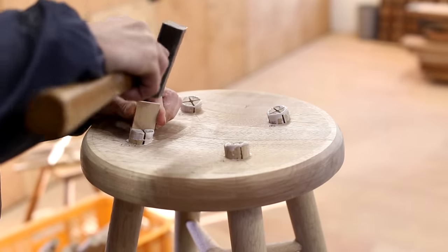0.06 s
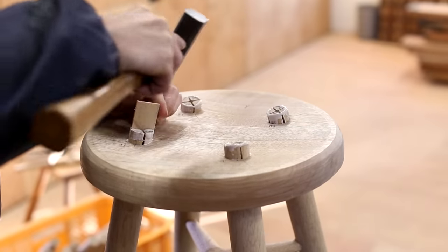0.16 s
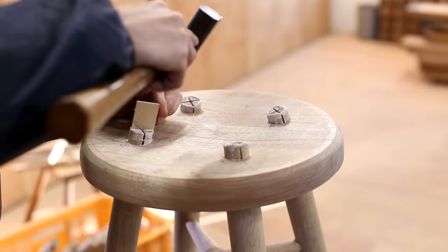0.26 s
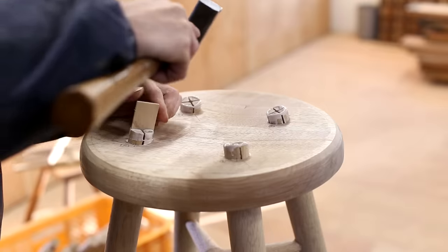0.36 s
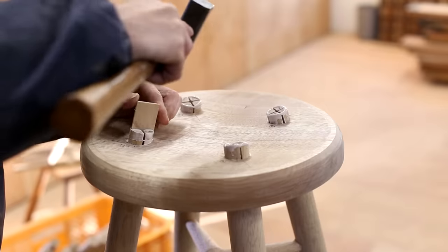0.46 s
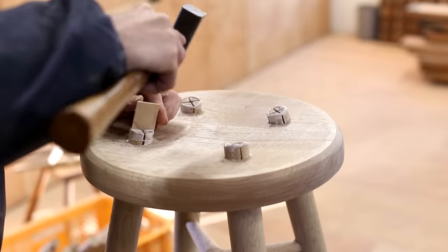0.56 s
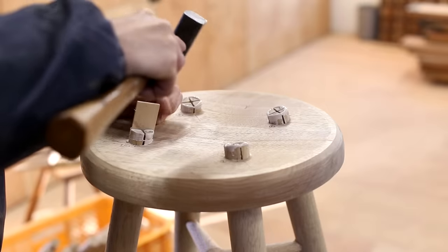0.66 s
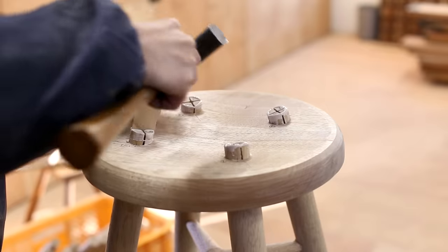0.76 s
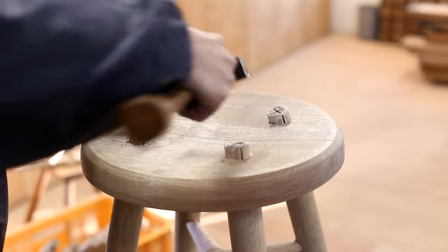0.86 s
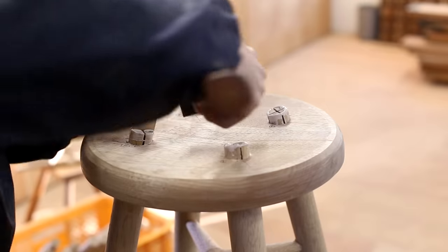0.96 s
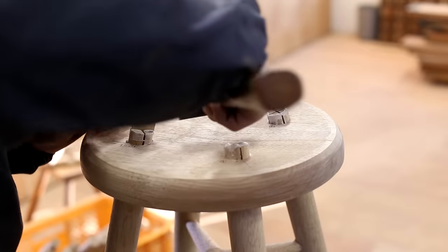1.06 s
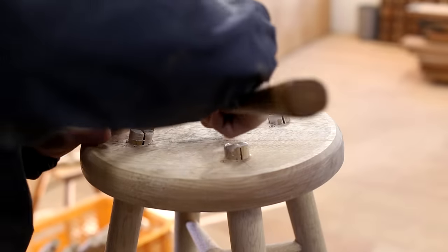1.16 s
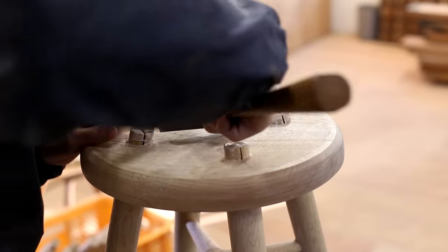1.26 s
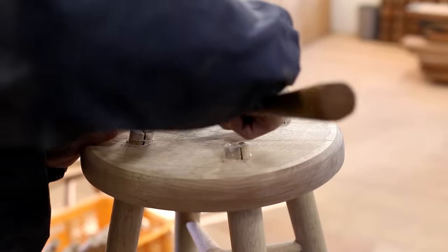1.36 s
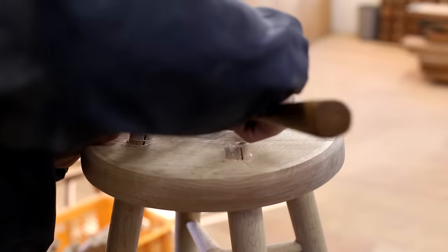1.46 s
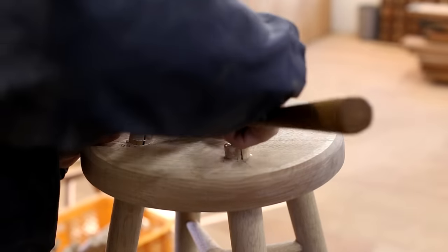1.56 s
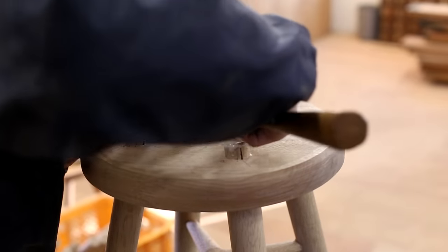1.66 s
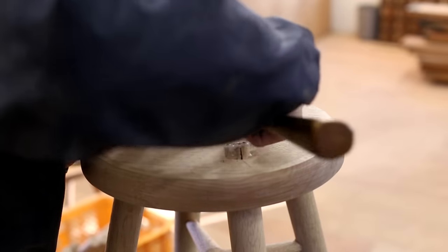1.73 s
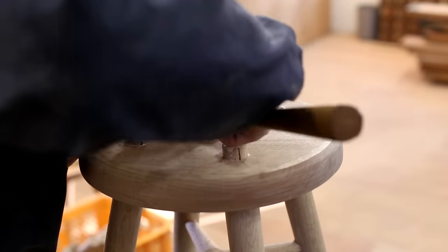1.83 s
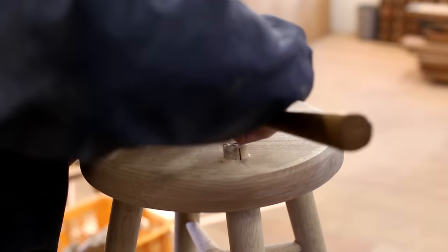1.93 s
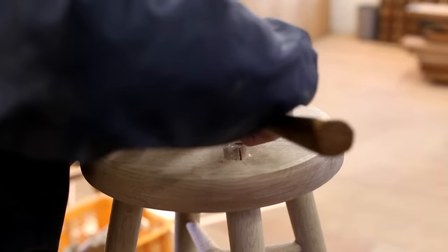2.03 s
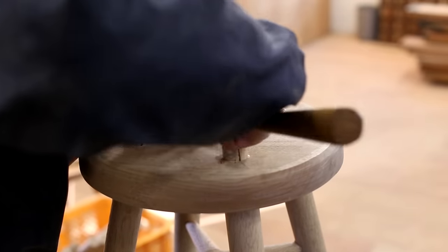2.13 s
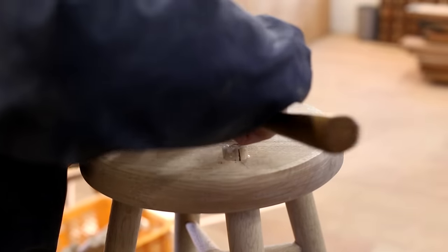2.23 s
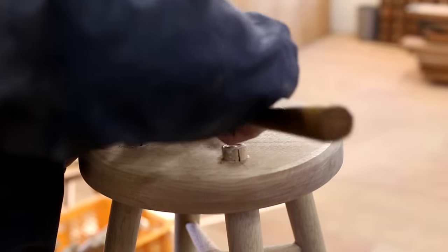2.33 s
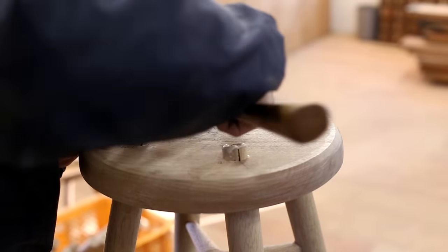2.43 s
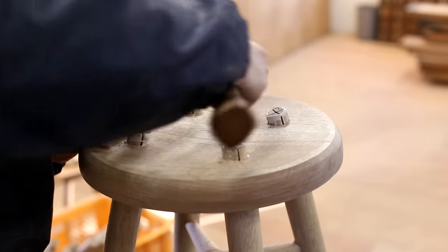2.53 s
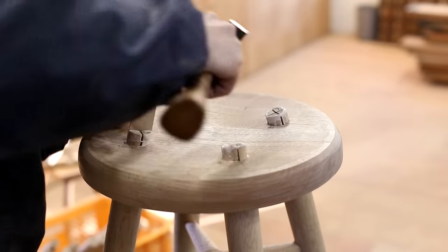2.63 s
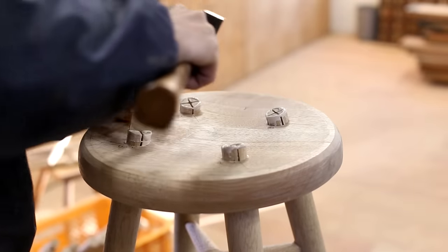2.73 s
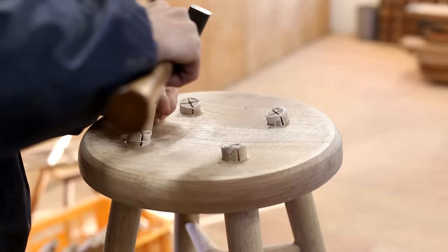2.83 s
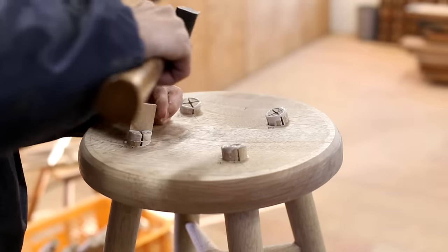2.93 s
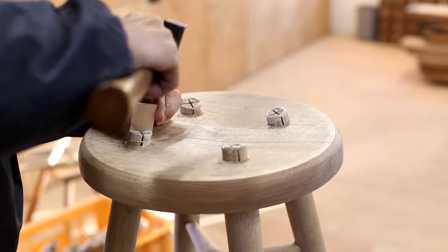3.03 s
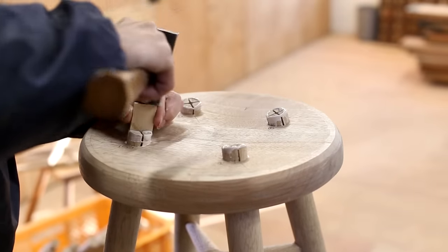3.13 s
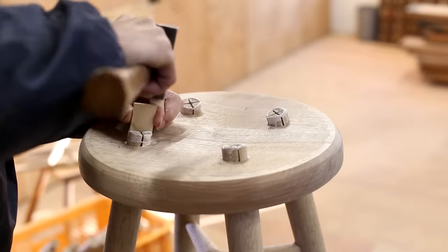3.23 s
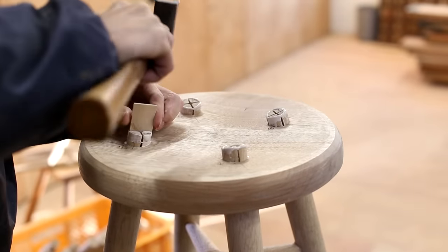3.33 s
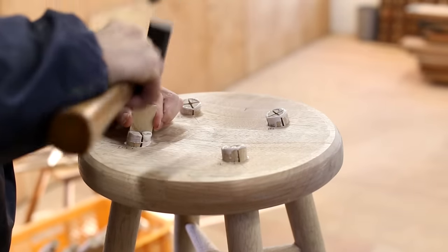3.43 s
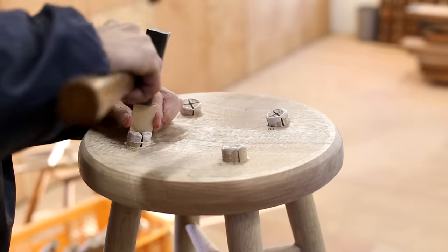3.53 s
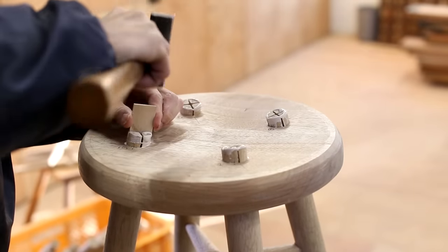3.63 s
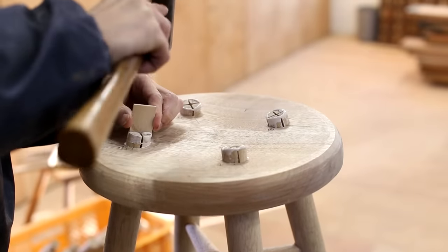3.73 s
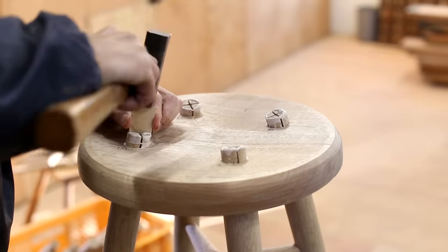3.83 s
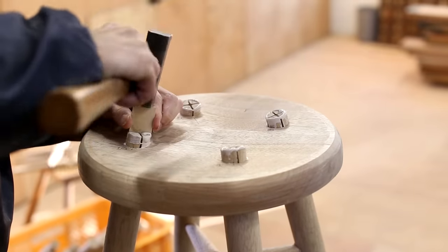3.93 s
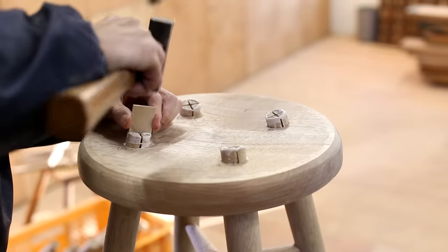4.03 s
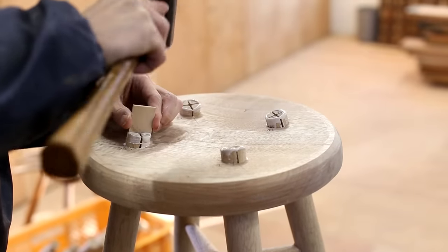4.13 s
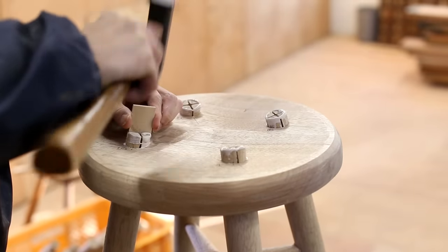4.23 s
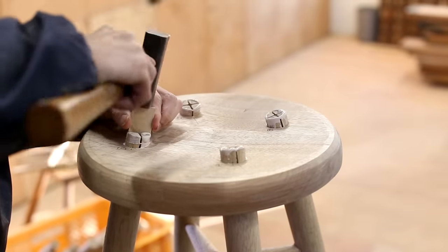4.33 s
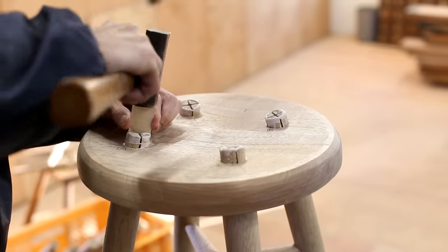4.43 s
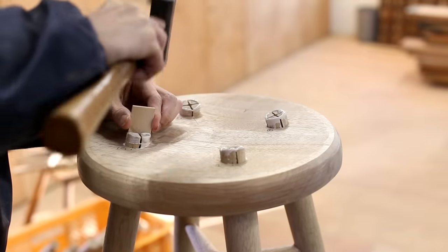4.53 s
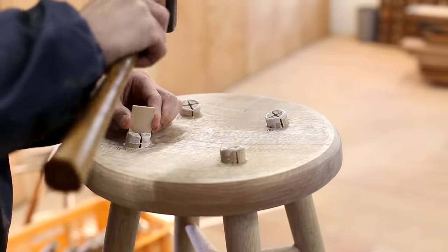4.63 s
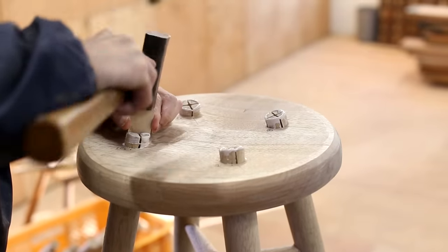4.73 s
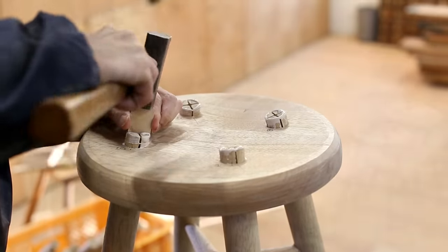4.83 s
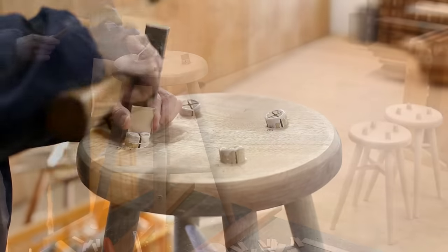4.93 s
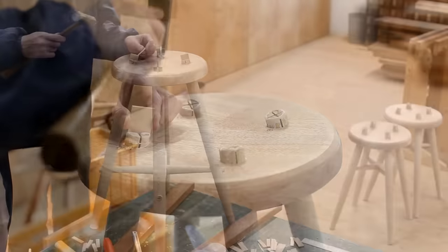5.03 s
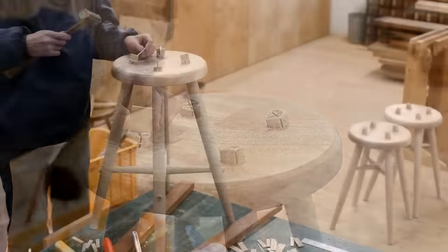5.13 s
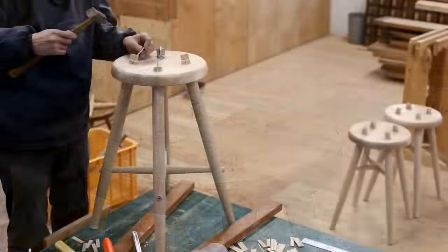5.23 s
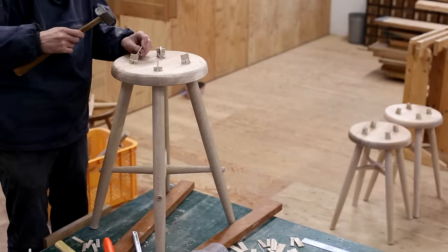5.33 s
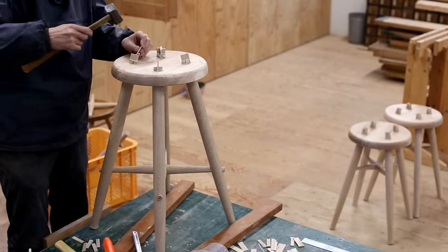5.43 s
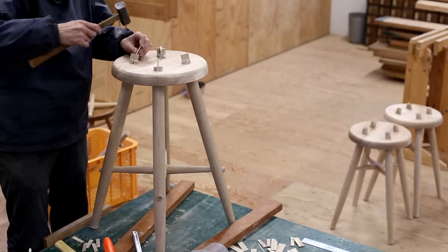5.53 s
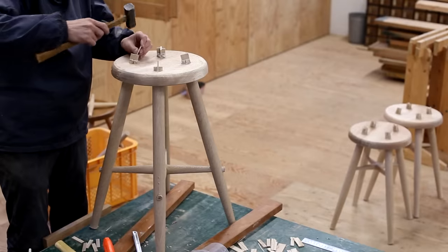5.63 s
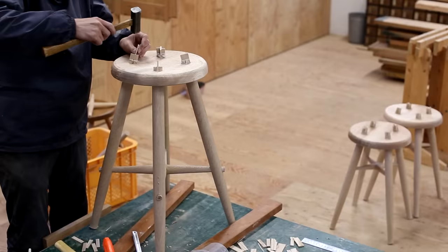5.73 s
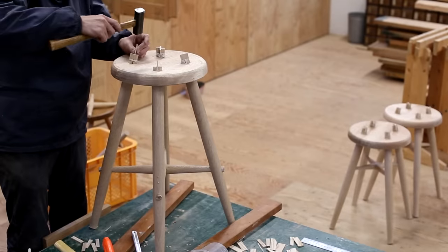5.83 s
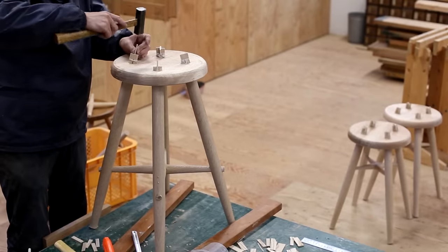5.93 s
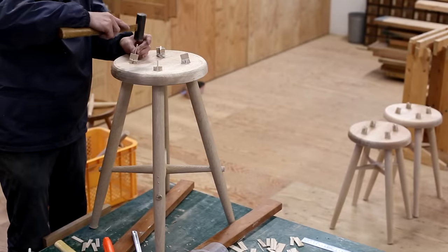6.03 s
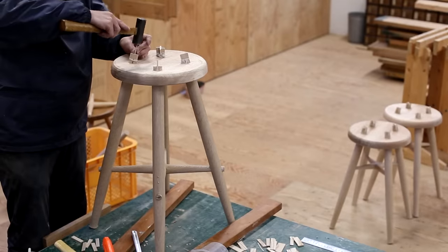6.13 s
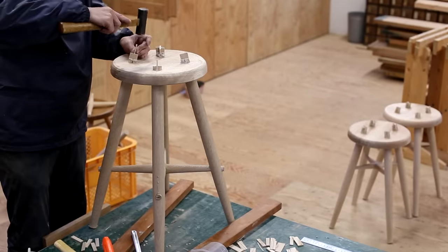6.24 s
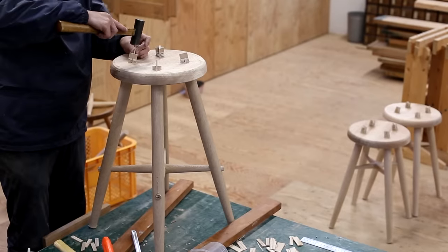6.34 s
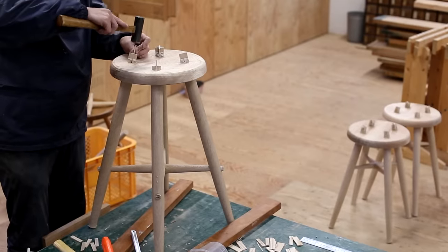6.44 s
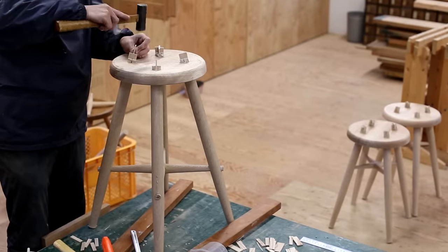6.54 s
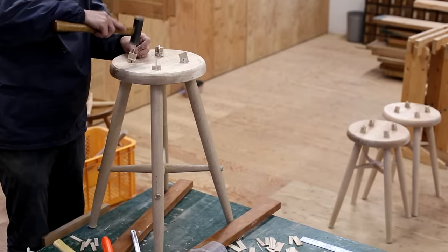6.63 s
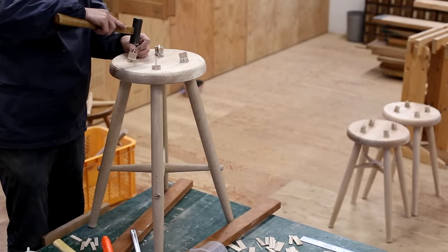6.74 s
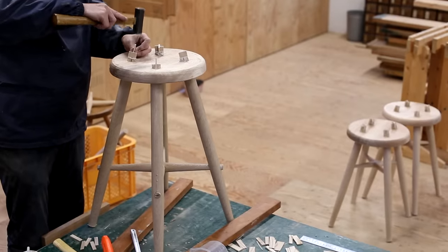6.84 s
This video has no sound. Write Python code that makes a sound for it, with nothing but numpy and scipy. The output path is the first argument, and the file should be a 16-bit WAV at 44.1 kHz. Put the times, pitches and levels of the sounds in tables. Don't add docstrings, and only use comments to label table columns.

```python
import sys
import numpy as np
from scipy import signal
from scipy.fft import rfft, irfft, next_fast_len
from scipy.io import wavfile
from scipy.ndimage import uniform_filter1d

SR = 44100
rng = np.random.default_rng(int(sys.argv[2]) if len(sys.argv) > 2 else 0)


def gain_from_db(level_db):
    decades = np.asarray(level_db, float) / 20
    return 10 ** decades


def to_wav(sig):
    pcm = np.clip(np.atleast_2d(sig), -1, 1) * 32767
    pcm = np.round(pcm).astype(np.int16)
    wavfile.write(sys.argv[1], SR, pcm.T)


N = 303849
LEAD = SR // 4


def unit(x):
    return x / np.sqrt(np.mean(x ** 2) + 1e-20)


def along(points, hz):
    f, v = np.transpose(points)
    return np.interp(np.log(hz + 1), np.log(f + 1), v)


def causal(gain):
    cepstrum = irfft(np.log(gain + 1e-6))
    half = len(cepstrum) // 2
    cepstrum[1:half] *= 2
    cepstrum[half + 1:] = 0
    return np.exp(rfft(cepstrum))


def noise(spectrum, lo_hz, hi_hz, patchy_db):
    z = signal.stft(rng.standard_normal(N + 512), nperseg=512)[2]
    patches = uniform_filter1d(rng.standard_normal(z.shape), 6, 0)
    patches = uniform_filter1d(patches, 8, 1)
    patchy = signal.istft(z * gain_from_db(patchy_db * unit(patches)), nperseg=512)[1][:N]
    hz = np.fft.rfftfreq(N, 1 / SR)
    shaped = rfft(patchy) * gain_from_db(along(spectrum, hz))
    in_band = irfft(shaped * (hz > lo_hz) * (hz < hi_hz), N)
    return irfft(shaped, N) / np.std(in_band)


# frequency in Hz, level in dB per Hz.
HUSH_SPECTRUM = [(20, -16), (50, 0), (120, 1), (250, -3), (600, -12.5), (1500, -12), (3500, -14),
                 (5000, -26), (10000, -25.5), (15500, -24.5), (16000, -73.5)]


def room_hush():
    return gain_from_db(-66) * noise(HUSH_SPECTRUM, 60, 400, patchy_db=.8)


# frequency in Hz, level in dB per Hz.
DRAG_SPECTRUM = [(150, -26.5), (300, -6), (700, -3), (1400, -1.5), (3000, -5.5), (4500, -8.5),
                 (6500, -30.5), (9000, -55.5)]
# frequency in Hz, level in dB per Hz.
SWISH_SPECTRUM = [(2500, -28.5), (4500, -2), (6000, 1.5), (10000, 2.5), (13000, -2.5), (15600, -13),
                  (16000, -47)]
# start in seconds, length in seconds, drag in dB,
# swish in dB against the drag.
ARM_MOVES = [(0, .15, -58, -1), (.2, 0.56, -77.5, 4), (0.755, .15, -57, -4), (0.91, .27, -52, -7),
             (1.297, .33, -63, -1), (1.718, 0.13, -78, 12.5), (1.898, .04, -73, 13), (2, .1, -68, 2),
             (2.16, .05, -71, 10), (2.33, .06, -78, 10), (2.51, .12, -56, -6.5), (2.636, .3, -55, -4),
             (2.985, .1, -59.5, -7.5), (3.2, .4, -77, -7.5), (5.403, .75, -61, -8), (5.686, .15, -61, -15),
             (6.043, .2, -62, -0.5), (6.27, .58, -69.5, 6.5)]


def sleeves():
    start, length, drag_db, swish_db = np.transpose(ARM_MOVES)[:, :, None]
    clock = np.arange(0, N + 64, 64) / SR
    t = clock - start
    swell = np.clip(t / (0.29 * length), 0, 1)
    settle_db = 102 * np.clip(t - length, 0, None)
    moves = swell * gain_from_db(drag_db - 4 - settle_db)

    def together(levels):
        return np.interp(np.arange(N) / SR, clock, np.linalg.norm(levels, axis=0))

    drag = together(moves) * noise(DRAG_SPECTRUM, 1000, 4000, patchy_db=1.5)
    swish = together(moves * gain_from_db(swish_db)) * noise(SWISH_SPECTRUM, 6000, 14000, patchy_db=.6)
    return drag + swish


# frequency in Hz, time to fall 60 dB in seconds.
HALL_T60 = [(80, 0.56), (250, 0.63), (700, 0.9), (1500, 0.76), (3500, 0.7), (6000, 0.41), (9000, 0.28),
            (12000, 0.28), (16000, .12)]
# frequency in Hz, level in dB.
HALL_TONE = [(80, -1), (500, 5.5), (2000, 1), (5000, -6), (10000, -11.5), (15500, -5), (16100, -43.5)]


def hall(early_db):
    hz, t, z = signal.stft(rng.standard_normal(SR), SR, nperseg=256)
    late = gain_from_db(-60 * t / along(HALL_T60, hz)[:, None])
    early = gain_from_db(early_db - 60 * t / 0.057)
    z = z * (late + early) * gain_from_db(along(HALL_TONE, hz))[:, None]
    tail = signal.istft(z, SR, nperseg=256)[1][:SR]
    tail = tail * np.clip(np.arange(SR) / SR / 0.0027 - .6, 0, 1)
    return tail / np.linalg.norm(tail)


def surface_rattle(m, f, rattle_s):
    t = np.arange(1024) / SR
    chatter = rng.standard_normal(len(t)) * gain_from_db(-60 * t / rattle_s) * (1 - np.exp(-t / 0.0011))
    rattle = rfft(chatter, m)
    rattle *= causal(1 / uniform_filter1d(np.abs(rattle), size=600))
    return rattle * 1j * f / (1500 + 1j * f)


def body_ring(modes, f):
    ring = np.zeros(len(f), complex)
    scatter = rng.normal(0, 1, (len(modes), 2)) * [1.2, .006]
    for (hz, width, db), (shift_db, detune) in zip(modes, scatter):
        centre = hz + hz * detune
        ring += gain_from_db(db + shift_db) * 1j * f * width / (centre ** 2 - f * f + 1j * f * width)
    return ring


def near_walls(f):
    bounces = sum(gain_from_db(db) * np.exp(-2j * np.pi * f * late_s) for late_s, db in [(.0131, -11), (.022, -7.5)])
    return 1 + bounces * (1090 / (1090 + 1j * f)) ** 2


# frequency in Hz, gain in dB.
BAND_GAINS = [(170, 8.5), (800, 0), (1750, -6), (4000, -2.5), (10000, -6)]


def contact_colour(thud, hard, tone, air_db, f):
    knock, clack, snap = tone
    against_peak = (thud, 0, knock, clack + 0.31 * hard, snap + hard)
    levels = [(hz, gain + db) for (hz, gain), db in zip(BAND_GAINS, against_peak)]
    low, high = levels[0][1], levels[-1][1] + air_db
    bottom = [(25, low - 44.5), (95, low - 2.5)]
    top = [(14500, high), (16500, high - 16.5)]
    return causal(gain_from_db(along(bottom + levels + top, f)))


def contacts(table, modes, tone, carried, wet_db, rattle_db, rattle_s, push_hz, early_db=9, air_db=-9):
    out = np.zeros(N + LEAD + 2 * SR)
    m = next_fast_len(SR + 8192)
    f = np.fft.rfftfreq(m, 1 / SR)
    push = (push_hz / (push_hz + 1j * f)) ** 2
    for s, db, thud, hard in table:
        ring = body_ring(modes, f)
        near = (1 + ring) * (push + gain_from_db(rattle_db) * surface_rattle(m, f, rattle_s))
        near *= near_walls(f)
        far = (1 + carried * ring) * gain_from_db(wet_db) * rfft(hall(early_db), m)
        colour = contact_colour(thud, hard, tone, air_db, f)
        start = LEAD + round(s * SR)
        out[start:start + SR] += gain_from_db(db + 27.5) * irfft(colour * (near + far), m)[:SR]
    return out[LEAD:LEAD + N]


# start in seconds, peak in dB at 500-1200
# Hz, thud in dB against it, hardness in dB.
CRACKLES = [(.11, -70, -5, -7), (.25, -70, -5, -3), (3.051, -65, -0.5, -7), (3.062, -71.5, -6, -3.5),
            (3.413, -76, -10, 1), (3.538, -71, -5, -1.5),
            (5.407, -77, -6, 0), (5.876, -79, -8, 0.006)]


def cloth_crackles():
    return contacts(CRACKLES, [], tone=(-6.5, 3, 15), carried=0, wet_db=-6.5,
                    rattle_db=7.0, rattle_s=.004, push_hz=2484)


# start in seconds, peak in dB at 500-1200 Hz, thud in dB against it, hardness in dB.
SMALL_TICKS = [(.817, -42.5, -25, -12), (1.003, -62, 22, -4), (1.3025, -40.5, -10.5, 18.5),
               (2.428, -39.5, -6, 0.5)]


def ticks():
    return contacts(SMALL_TICKS, [], tone=(.5, 0, -18.5), carried=0, wet_db=-10.0,
                    rattle_db=-5.0, rattle_s=.008, push_hz=2540)


# start in seconds, peak in dB at 500-1200 Hz, thud in dB against it, hardness in dB.
LIGHT_TOUCHES = [(.581, -50, -20, 0), (.650, -54, -20, 4), (1.3082, -31, -20, 0), (1.668, -29, -20, 0)]
# frequency in Hz, width in Hz, level in dB over the plain blow.
PING_MODE = [(1497, 70, 24)]


def light_touches():
    return contacts(LIGHT_TOUCHES, PING_MODE, tone=(0, -21, -33), carried=.7, wet_db=-13,
                    rattle_db=-6, rattle_s=.008, push_hz=4000)


# start in seconds, peak in dB at 500-1200 Hz, thud in dB against it, hardness in dB.
FAR_BLOWS = [
    (6.198, -39, 6.8, .6),
    (6.456, -30, 5.1, .1),
    (6.769, -25.5, 3.5, -.4),
]
FAR_TOUCHES = [(5.716, -69.5, 12.5, 3), (5.735, -64, -9, -4)]
# frequency in Hz, width in Hz, level in dB over the plain blow.
FAR_MODES = [(114, 22, 2.8), (144.5, 20, 18.3), (215, 32, 12.3), (338, 12, 19), (463, 17, 19),
             (785, 140, 5.5), (1380, 76, 22.7), (1945, 54, 15), (2775, 82, 17.6), (3070, 110, 14.7),
             (3560, 120, 7.5), (3800, 240, 7.6), (7500, 700, 12.5)]


def wide_position():
    struck = contacts(FAR_BLOWS, FAR_MODES, tone=(1.7, 4.1, 1.9), carried=.35, wet_db=5,
                      rattle_db=-2.5, rattle_s=0.0083, push_hz=510, early_db=10)
    touched = contacts(FAR_TOUCHES, FAR_MODES, tone=(8.6, 3.3, -6), carried=0.49, wet_db=-2.0,
                       rattle_db=-9, rattle_s=0.014, push_hz=895)
    return struck + touched


# start in seconds, peak in dB at 500-1200 Hz, thud in dB against it, hardness in dB.
HANDLE_KNOCK = [(1.3062, -29, 1.4, 0)]
# frequency in Hz, width in Hz, level in dB over the plain blow.
HANDLE_RING = [(110, 16, 3.1), (228, 79, 13), (302, 28, 11.6), (520, 36, 2.4), (717, 7.3, 2.4),
               (890, 20, 4.3), (1512, 43, 28.6), (1810, 32, 6), (2200, 62, 7.3), (3180, 62, 4.9)]


def handle_tap():
    return contacts(HANDLE_KNOCK, HANDLE_RING, tone=(3.3, -2.1, -27.5), carried=.55, wet_db=-3.5,
                    rattle_db=-6, rattle_s=.01, push_hz=2500)


# start in seconds, peak in dB at 500-1200 Hz, thud in dB against it, hardness in dB.
SEATING_BLOW = [(3.186, -8.5, -9.5, 0)]
# frequency in Hz, width in Hz, level in dB over the plain blow.
SEATING_RING = [(118, 68, 2), (241, 30, 11), (306.4, 10, 6), (558, 9.6, 13), (658, 19, 8.7), (890, 30, 9.7),
                (1340, 30, 2), (1810, 190, 8.6), (2300, 53, 1.6)]


def seating_blow():
    return contacts(SEATING_BLOW, SEATING_RING, tone=(-8, -20, -33), carried=0.61, wet_db=-3,
                    rattle_db=-1.0, rattle_s=0.0092, push_hz=1554, early_db=15)


# start in seconds, peak in dB at 500-1200 Hz, thud in dB against it, hardness in dB.
TAPS = [
    (1.6665, -18, -7, -4),
    (1.937, -14.5, -9, 10.5),
    (2.211, -16.5, -6.5, 6),
    (2.432, -18.5, -2, -4),
]
# frequency in Hz, width in Hz, level in dB over the plain blow.
TAP_RING = [(104, 8.7, 16), (145.6, 10, 6), (217, 12, 8), (292.4, 38, 11.5), (565, 40, -3), (875, 7.6, 10),
            (1460, 26, 13.5), (1816, 26, 16), (2280, 100, 10.5), (3010, 85, 0), (3500, 62, 4.5),
            (4150, 31, 4.5), (6250, 1600, 2.5)]


def side_taps():
    return contacts(TAPS, TAP_RING, tone=(3, -8.5, -19.5), carried=0.8, wet_db=-1.85,
                    rattle_db=1.0, rattle_s=0.0057, push_hz=2560, air_db=-18)


# start in seconds, peak in dB at 500-1200 Hz, thud in dB against it, hardness in dB.
BLOW_BEFORE = [(-.06, -7, -6.5, 13)]
DRIVING_BLOWS = [
    (3.557, -6.5, -15.5, -5.5),
    (3.943, -10, -11.5, 0.5),
    (4.373, -12.5, -9, 4),
    (4.839, -12, -9.5, 5),
    (5.312, -32.5, -13, 4.5),
]
# frequency in Hz, width in Hz, level in dB over the plain blow.
WEDGE_RING = [(116.9, 13, 12), (238.7, 17, 5.9), (329.6, 170, 2.7), (530, 17, 1.4), (724, 12, 0.57),
              (896, 69, 5.1), (1400, 410, 3.9), (1749, 33, 12.6), (3032, 150, 7.2), (4077, 220, 5.5),
              (4445, 39, 13), (4870, 180, 5.6), (5550, 220, 3.4), (8130, 97, 1)]


def wedge_blows(fade):
    struck = []
    for s, db, thud, hard in DRIVING_BLOWS:
        fade_db = 20 * np.log10(max(fade[round(s * SR)], .05))
        struck.append((s, db - fade_db, thud, hard))
    return contacts(BLOW_BEFORE + struck, WEDGE_RING, tone=(.1, -4, -5.5), carried=0.9, wet_db=0.5,
                    rattle_db=6.5, rattle_s=0.0061, push_hz=2960)


# start in seconds, end in seconds.
DISSOLVE_SPAN = (4.985, 5.4)


def scene():
    fade = np.interp(np.arange(N) / SR, DISSOLVE_SPAN, [1, 0])
    close = ticks() + light_touches() + handle_tap() + seating_blow() + side_taps() + wedge_blows(fade)
    return (room_hush() + sleeves() + cloth_crackles() + wide_position() + close * fade)[None]


def low_pass(x):
    return signal.sosfilt(signal.butter(12, 16850, fs=SR, output="sos"), x)


def record(dry):
    t = np.arange(N) / SR
    power = uniform_filter1d(dry[0] ** 2, 220, origin=109)
    level_db = 10 * np.log10(np.abs(power) + 1e-12)
    release = 40 * t
    held_db = np.maximum.accumulate(level_db + release) - release
    grab = 1 - np.exp(-1 / (0.00056 * SR))
    cut_db = signal.lfilter([grab], [1, grab - 1], .5 * np.clip(held_db + 17.0, 0, 30))
    cut_db = np.maximum(cut_db, 8 - 24 * t)
    x = dry * gain_from_db(-cut_db)
    x = x / (1 + np.abs(x / .53) ** 12) ** (1 / 12)
    x = signal.sosfilt(signal.butter(3, 15300, fs=SR, output="sos"), x)
    return low_pass(x)


dry = scene()
out = record(dry)
to_wav(out)
```